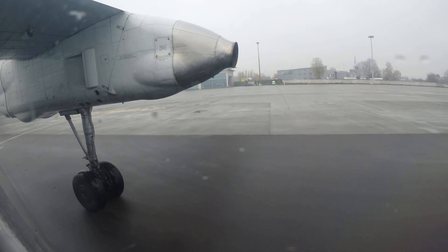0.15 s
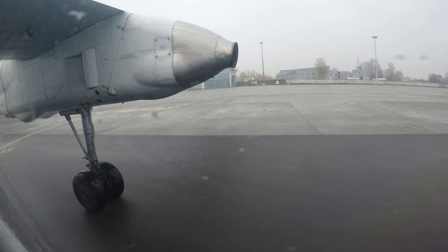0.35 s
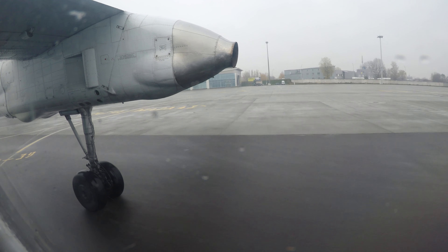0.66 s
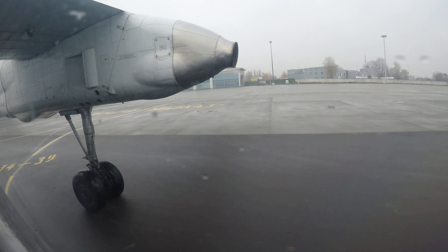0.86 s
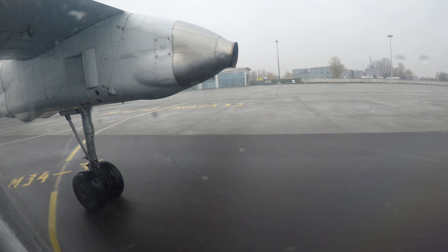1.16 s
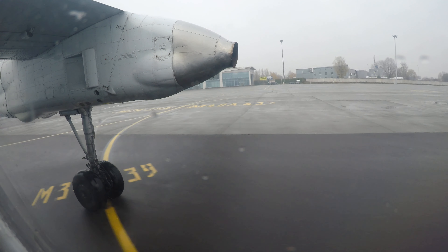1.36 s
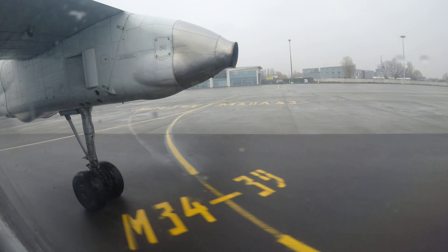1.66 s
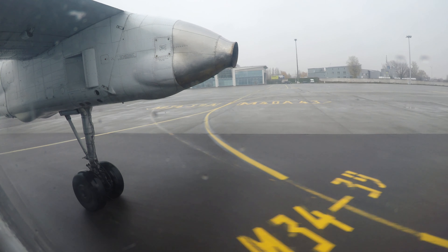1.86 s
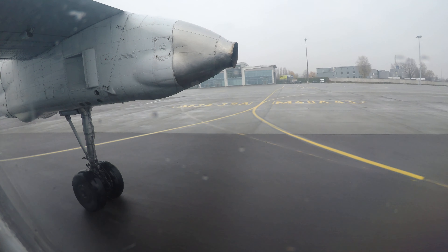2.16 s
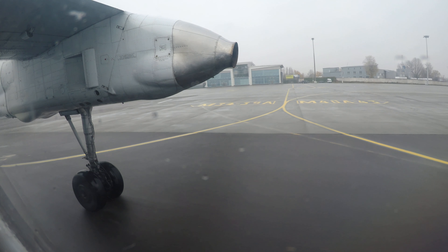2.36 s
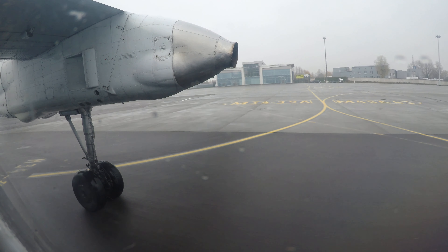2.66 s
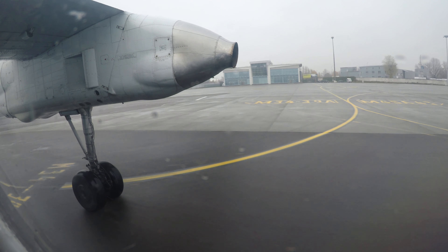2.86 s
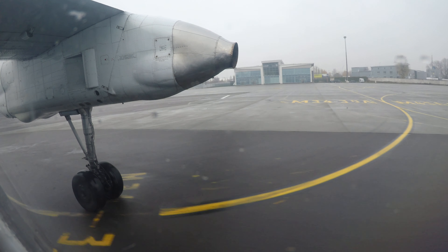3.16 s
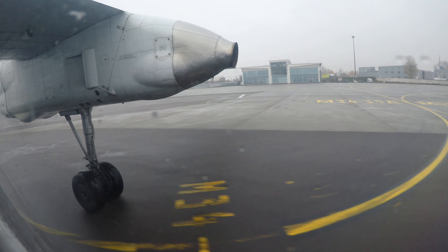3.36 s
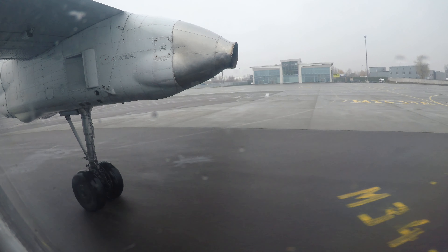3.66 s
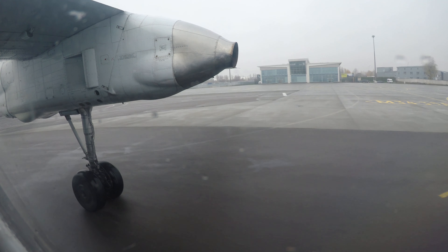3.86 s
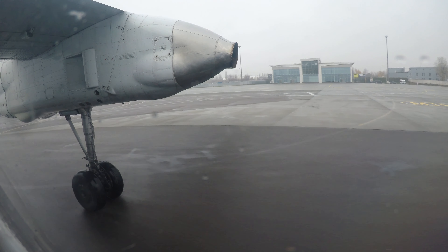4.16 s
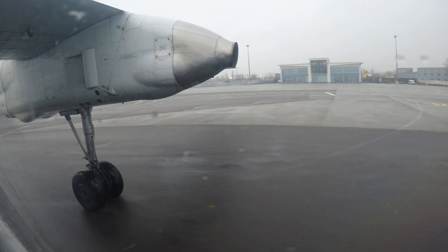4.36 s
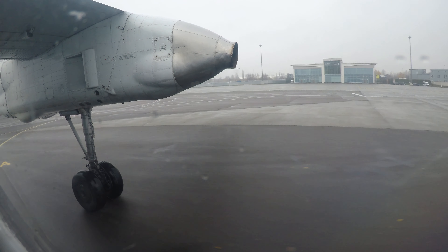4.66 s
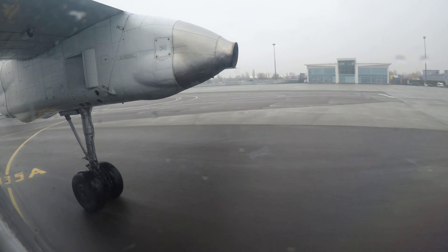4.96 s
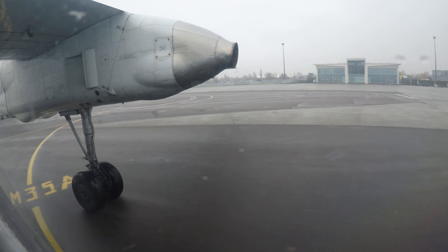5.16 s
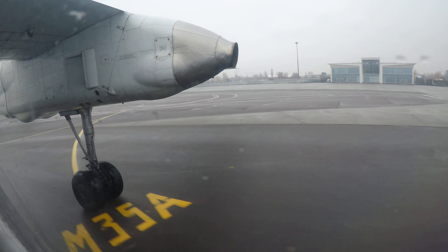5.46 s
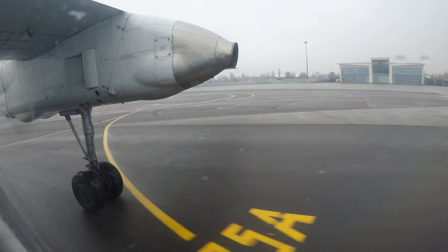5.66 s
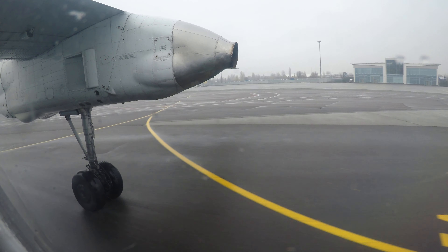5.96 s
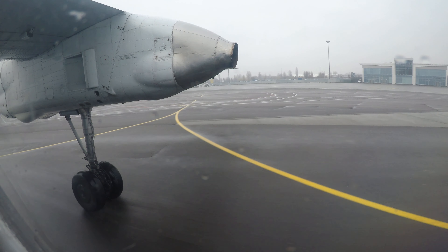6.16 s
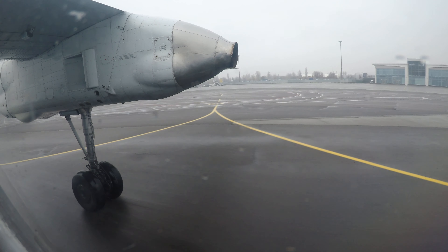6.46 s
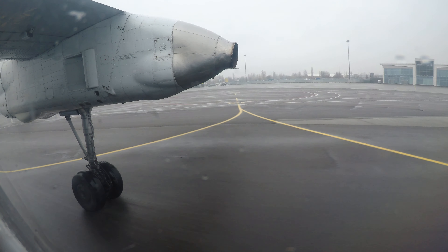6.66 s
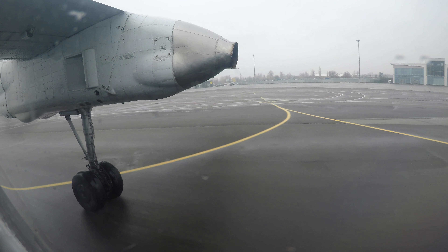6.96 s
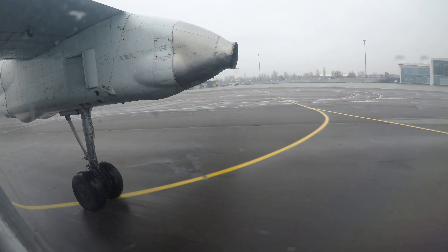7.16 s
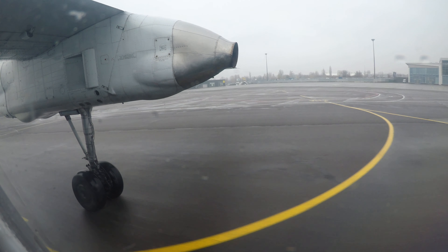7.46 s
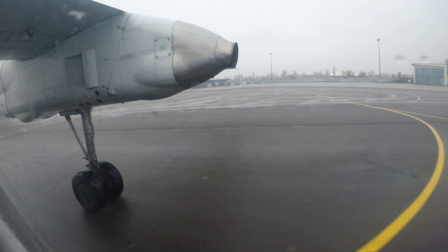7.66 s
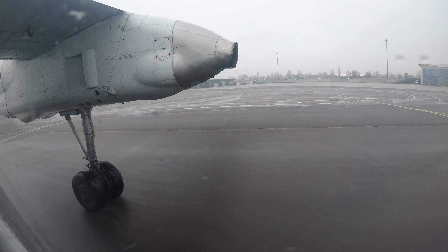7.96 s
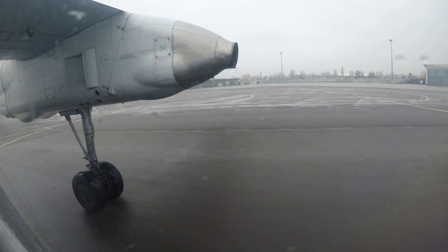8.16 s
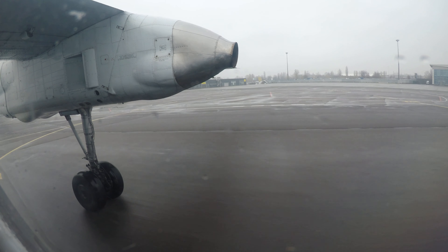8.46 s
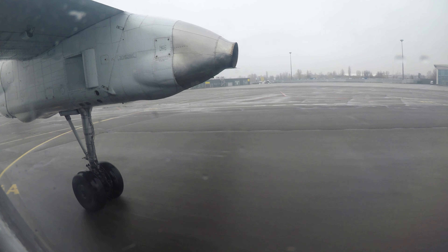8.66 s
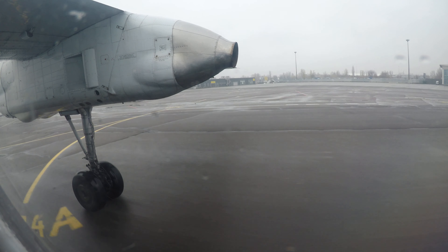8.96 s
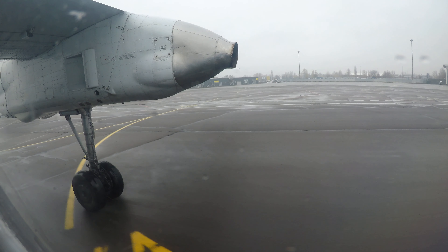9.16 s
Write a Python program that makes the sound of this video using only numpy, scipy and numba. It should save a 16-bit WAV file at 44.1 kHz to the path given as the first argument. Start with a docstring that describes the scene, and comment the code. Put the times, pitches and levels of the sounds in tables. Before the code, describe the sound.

Loud, steady turboprop drone with rushing air and a thin whine inside a taxiing aircraft's cabin, rising slightly in pitch about halfway through.

```python
"""Inside the cabin of a taxiing turboprop, one microphone at a seat. Beyond the hull the propeller
blades beat out a fuzzy stack of tones and the turbine whines through their wakes; the power comes up
after about five seconds. All around, the airflow roars and hisses and the cabin air booms; nearby,
loose trim ticks now and then. An automatic gain control rides the drone."""
import sys
import numpy as np
from scipy import signal
from scipy.fft import rfft, irfft
from scipy.io import wavfile
from scipy.ndimage import uniform_filter1d, minimum_filter1d
from numba import njit

SR = 44100
rng = np.random.default_rng(int(sys.argv[2]) if len(sys.argv) > 2 else 0)


def digitize_waveform(pressure):
    """Quantize a signal to 16-bit integers and store it at the path in sys.argv[1].

    Rows of a 2-D input are taken as channels; values are limited to [-1, 1].
    """
    field = np.atleast_2d(pressure).T
    bounded = np.clip(field, -1, 1)
    quanta = np.round(bounded * 32767).astype(np.int16)
    wavfile.write(sys.argv[1], SR, quanta)


N = 410991

# Slow levels of the drone: (time [s], blade orders 1, 3, 4, 5 [dB each], cabin boom [dB])
DRONE_LEVELS = [(0, -32.5, -25.5, -17.5, -11.5, -11.5), (1, -27.5, -21.5, -18, -13, -15.5),
                (1.8, -26.5, -19, -22, -14, -12.5), (2.5, -21, -24, -16.5, -14, -13.5),
                (3.3, -32, -17.5, -18.5, -12, -14.5), (3.9, -33.5, -18, -13.5, -14.5, -13),
                (4.3, -21.5, -26.5, -21.5, -14.5, -14.5), (5, -22, -17.5, -23.5, -11, -12.5),
                (5.3, -28, -22, -25, -17, -18), (5.53, -26.5, -25, -27, -15.5, -26.5),
                (5.62, -29.5, -15.5, -15, -12, -29.5), (6.3, -28.5, -7, -16, -13.5, -24),
                (6.7, -25.5, -12.5, -12, -12, -25.5), (7.1, -19, -11.5, -12.5, -14, -17.5),
                (7.6, -16.5, -3.5, -15, -15.5, -21), (8.2, -17, -3.5, -10, -13.5, -20.5),
                (8.7, -17, -6, -12, -17, -19), (9.32, -17, -13.5, -19.5, -14.5, -23)]


def gain_of(db):
    """Decibels as an amplitude factor."""
    return 10 ** (np.asarray(db) / 20)


def unit_rms(x):
    """Scales to an rms of 1."""
    return x / np.sqrt(np.mean(abs(x) ** 2) + 1e-20)


def curves(rows):
    """A timed table's columns as curves, one value a sample."""
    times, *columns = np.transpose(rows)
    return [np.interp(np.arange(N) / SR, times, column) for column in columns]


def flutter(width_hz, hop=16):
    """Slow complex noise of rms 1: the random envelope that blurs a tone."""
    pole, steps = np.exp(-np.pi * width_hz * hop / SR), N // hop + 2
    noise = rng.standard_normal((steps + 1000, 2)) @ [1, 1j]
    slow = signal.lfilter([1], np.convolve([1, -pole], [1, -pole]), noise)[-steps:]
    return unit_rms(np.interp(np.arange(N) / hop, np.arange(steps), slow))


def steadied(envelope, window_s=.55):
    """Keeps the quick flutter and evens out slow swells."""
    return envelope / np.sqrt(uniform_filter1d(abs(envelope) ** 2, round(window_s * SR)) + 0.08)


def phase_of(hz):
    """Running phase in radians of a steady or gliding pitch."""
    return 2 * np.pi * np.cumsum(hz * np.ones(N)) / SR


def tone(hz, envelope):
    """A carrier at the given pitch, as strong in rms as its envelope."""
    return np.sqrt(2) * (envelope * np.exp(1j * phase_of(hz))).real


def ring(x, hz, width_hz):
    """A two-stage resonance of gain 1 at hz."""
    b, a = signal.iirpeak(hz, hz / width_hz, SR)
    return signal.lfilter(b, a, signal.lfilter(b, a, x))


def airflow(power):
    """The bed under everything: a broad, patchy roar of air heard through the hull."""
    # Shape of the roar: (frequency [Hz], relative level [dB])
    spectrum = [(12, -49), (20, -22.5), (65, -8.5), (129, -9), (263, -3.5), (376, -5.5), (494, -18.5),
                (687, -22), (903, -22.5), (1190, -23.5), (1330, -31.5), (1790, -36.5), (3370, -57),
                (5990, -51), (14000, -81)]
    knot_hz, knot_db = np.transpose(spectrum)
    frames, hz = N // 256 + 5, np.fft.rfftfreq(1024, 1 / SR)
    shape_db = np.interp(np.log(hz + 1), np.log(knot_hz + 1), knot_db)[:, None]
    real, imag, patches = rng.standard_normal((frames, 513, 3)).T
    patch_db = 0.86 * unit_rms(uniform_filter1d(uniform_filter1d(patches, 40, axis=0), 8, axis=1))
    bins = (real + 1j * imag) * gain_of(shape_db + patch_db)
    roar = signal.istft(bins, nperseg=1024, noverlap=768)[1][:N]
    return gain_of(-17.5 + 0.55 * power) * unit_rms(roar)


def hull(power):
    """Airflow noise rings the hull and cabin; the resonances shift in strength as the power comes up."""
    # Resonances: (frequency [Hz], width [Hz], level at idle [dB], level with power up [dB])
    resonances = [(34.2, 14, -32, -31), (62.4, 15, -42.5, -34), (111.4, 14, -29, -26),
                  (201, 24, -23.5, -36), (241, 22, -32, -26), (292, 7.7, -29, -24.5), (353, 80, -20, -19.5),
                  (412, 35, -27.5, -38.5), (594, 17, -41, -47), (671, 24, -36.5, -39.5),
                  (733, 68, -38, -43.5), (1114, 170, -34.5, -33.5), (1195, 40, -39.5, -38.5),
                  (1572, 120, -49, -50.5), (1940, 110, -57.5, -57.5), (4130, 880, -55.5, -59.5),
                  (4810, 250, -65, -70.5), (6140, 810, -58.5, -78), (6400, 620, -71.5, -54.5),
                  (7720, 840, -60, -65.5), (9970, 1600, -62, -64.5)]
    hz = np.fft.rfftfreq(N, 1 / SR)
    noise = rfft(rng.standard_normal(N))
    spectra = np.zeros((2, len(hz)))
    for centre_hz, width_hz, *levels_db in resonances:
        bell = 1 / (1 + (2 * (hz - centre_hz) / width_hz) ** 2) ** 2
        spectra += gain_of(levels_db)[:, None] ** 2 * bell / bell.mean()
    idle, up = irfft(noise * np.sqrt(spectra), N)
    return idle + power * (up - idle)


def trim_panel(x):
    """A trim panel rings in the treble when rubbed."""
    # Panel modes: (frequency [Hz], width [Hz], gain [dB])
    modes = [(2300, 600, -1.5), (4200, 800, 0.5), (5200, 600, -0.5), (6660, 1200, -3.5),
             (10000, 1200, -12.5)]
    return sum(gain_of(db) * ring(x, hz, width_hz) for hz, width_hz, db in modes)


def trim_ticks(faint_per_s=9.8):
    """Loose trim nearby: bursts of friction noise ring the panel, a few distinct and many faint."""
    # Distinct rattles: (time [s], gain [dB], length [s], pitch of the ring that stands out [Hz])
    rattles = [(.802, -31, .006, 4000), (2.534, -46, .012, 4000), (2.552, -30, .008, 5700),
               (3.15, -25.5, .004, 5170), (3.568, -34, .005, 5900), (5.364, -30, .016, 6450),
               (5.413, -36, .014, 7000), (5.628, -34, .005, 5800), (5.739, -32, .005, 5300),
               (5.856, -33, .006, 4000), (7.242, -33, .006, 4200), (7.546, -37, .005, 4200),
               (7.654, -31.5, 0.0055, 4500), (8.354, -37, .005, 4220)]
    out, t = np.zeros(N), np.arange(2000) / SR
    for start_s, db, length_s, hz in rattles:
        attack = np.minimum(t / 0.00082, 1)
        burst = rng.standard_normal(len(t)) * attack * np.exp(-(t / length_s) ** 3)
        out[round(start_s * SR):][:len(t)] += gain_of(db) * (trim_panel(burst) + 0.6 * ring(burst, hz, 1200))
    onsets = rng.random(N) < faint_per_s / SR
    taps = onsets * gain_of(3.6 * np.minimum(rng.exponential(1, N), 4))
    faint = signal.oaconvolve(taps, np.exp(-t / .003))[:N] * rng.standard_normal(N)
    return out + gain_of(-44) * trim_panel(faint)


def whirr(power, hz=1183):
    """A narrow fluttering band, perhaps the gearbox, that eases a little under power."""
    envelope = flutter(width_hz=83) * gain_of(3.8 * flutter(width_hz=9.8).real)
    return gain_of(-35 - 2.5 * power) * tone(hz, envelope)


def turbine(blade_hz, power, ratio=78.7, upper_ratio=97):
    """The whine outside: each passing blade wake dims it and bends its pitch, giving a comb of sidebands."""
    # Slow level of the whine: (time [s], level [dB])
    levels = [(0, -50), (2, -50.5), (3, -51.5), (5.1, -50), (5.6, -54), (6.1, -47.5), (7, -54.5),
              (8.07, -58), (8.5, -52), (9.32, -55)]
    # Its bands: (blur [Hz], share at idle [dB], share with power up [dB], wake chop [Np], bend [rad])
    bands = [(60, -6, -6, 0.23, 1.2), (330, -2.5, -4.5, .3, .1)]
    out, blade_phase = np.zeros(N), phase_of(blade_hz)
    whine_db = curves(levels)[0] + 2 * flutter(width_hz=12).real  # flickers at random
    for blur_hz, idle_db, up_db, chop, bend in bands:
        wakes = np.exp(chop * np.cos(blade_phase) + 1j * bend * np.sin(blade_phase + .9))
        whine = tone(ratio * blade_hz, unit_rms(flutter(blur_hz) * wakes))
        out += gain_of(whine_db + idle_db + power * (up_db - idle_db)) * whine
    upper_whine = tone(upper_ratio * blade_hz, flutter(width_hz=300))
    return out + gain_of(-57.5 - 20 * power) * upper_whine


def cabin_boom(hz=132.26, width_hz=37.5):
    """The cabin's loudest air resonance, a low fluttering boom around the microphone."""
    boom_db = curves(DRONE_LEVELS)[-1]
    return gain_of(boom_db) * tone(hz, steadied(flutter(width_hz)))


def propellers(blade_hz, power):
    """The main drone: tones at multiples of the blade rate, blurred as the blades cut turbulent air."""
    # Loud tones: (order, blur [Hz], clean share at idle [0-1], clean share with power up [0-1],
    # pull of a neighbouring hull resonance on the blurred part at idle [Hz])
    loud_orders = [(1, 8, .15, .22, 0.44), (3, 23.5, .05, .35, 5), (4, 18.2, 0.09, 0.25, -8),
                   (5, 20.4, 0.2, 0.089, -3)]
    # Faint tones, all blur: (order, blur [Hz], level at idle [dB], level with power up [dB])
    faint_orders = [(2, 5.3, -20.5, -23.5), (6, 32, -31.5, -29.5), (7, 14, -33, -39), (8, 22, -36.5, -30.5),
                    (9, 35, -31.5, -38.5)]
    out, order_db = np.zeros(N), curves(DRONE_LEVELS)[:-1]
    for (order, blur_hz, idle, up, pull_hz), db in zip(loud_orders, order_db):
        clean = idle + np.sqrt(power) * (up - idle)
        halo = flutter(blur_hz) * np.exp(1j * phase_of(pull_hz * (1 - power)))
        envelope = np.sqrt(clean) + np.sqrt(1 - clean) * halo
        out += gain_of(db) * tone(order * blade_hz, steadied(envelope))
    for order, blur_hz, idle_db, up_db in faint_orders:
        out += gain_of(idle_db + power * (up_db - idle_db)) * tone(order * blade_hz, flutter(blur_hz))
    return out


def at_seat(x):
    """Cabin reflections cancel at the microphone in a few narrow bands."""
    # Standing-wave nulls: (frequency [Hz], width [Hz], depth [dB])
    nulls = [(84, 2.9, -4), (174, 8.9, -6.5), (420, 4.1, -4), (549, 12, -5.5)]
    hz = np.fft.rfftfreq(N, 1 / SR)
    dips_db = sum(db / (1 + (2 * (hz - null_hz) / width_hz) ** 2) for null_hz, width_hz, db in nulls)
    return irfft(rfft(x) * gain_of(dips_db), N)


def scene():
    """Everything heard at one seat, in mono; power runs from 0 at idle to 1 as the blades speed up."""
    # Blades passing the hull: (time [s], blade rate [Hz])
    blade_rates = [(0, 76.5), (4.6, 76.5), (5, 77), (5.5, 78.1), (6, 79.3), (6.5, 80.7), (7, 82.2),
                   (7.5, 82.9), (9.32, 83.3)]
    blade_hz, = curves(blade_rates)
    power = (blade_hz - blade_hz.min()) / np.ptp(blade_hz)
    drone = cabin_boom() + propellers(blade_hz, power)
    machinery = turbine(blade_hz, power) + whirr(power)
    roar = airflow(power) + hull(power)
    return (at_seat(drone + machinery + roar) + trim_ticks())[None]


@njit
def ride(level_db, limit_db, attack_s, release_s):
    """Gain in dB that drops fast when the level is over the limit and creeps back."""
    cut_db, gain_db = 0., np.zeros(len(level_db))
    for i in range(len(level_db)):
        excess_db = max(level_db[i] - limit_db, 0.)
        lag_s = attack_s if excess_db > cut_db else release_s
        cut_db += (excess_db - cut_db) / (lag_s * SR)
        gain_db[i] = -cut_db
    return gain_db


def record(dry, cutoff_hz=14300):
    """Behind the microphone: gain control rides the drone and pumps the hiss; then limiter and low-pass."""
    fast_db = 10 * np.log10(abs(uniform_filter1d(dry[0] ** 2, size=300)) + 1e-12)
    slow_db = 10 * np.log10(abs(uniform_filter1d(dry[0] ** 2, size=15000)) + 1e-12)
    duck_db = 0.4 * ride(fast_db, limit_db=-14., attack_s=0.0016, release_s=0.036)
    levelled = dry * gain_of(3.0 - 0.25 * (slow_db + 8.9) + duck_db)
    peaks = -minimum_filter1d(-abs(levelled[0]), size=401)  # sees each peak just before it arrives
    limiter_db = ride(20 * np.log10(peaks + 1e-9), limit_db=-0.65, attack_s=40 / SR, release_s=.08)
    limited = levelled * gain_of(uniform_filter1d(limiter_db, size=100))
    lowpass = signal.firwin(511, cutoff_hz, window=("kaiser", 9), fs=SR)
    return signal.oaconvolve(limited, lowpass[None], "same")


dry = scene()
out = record(dry)
digitize_waveform(out)
```